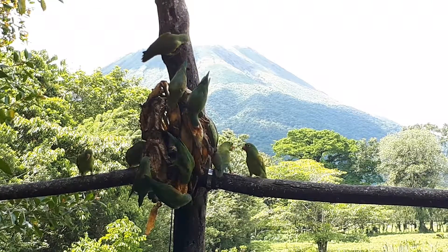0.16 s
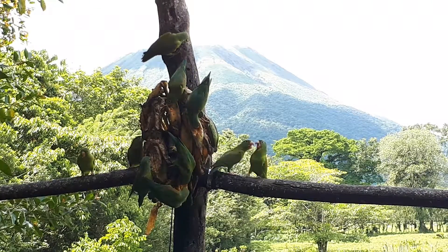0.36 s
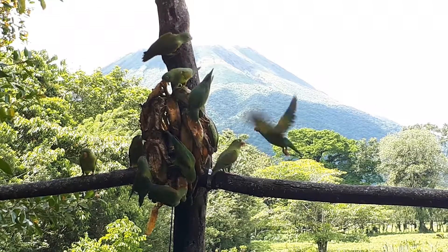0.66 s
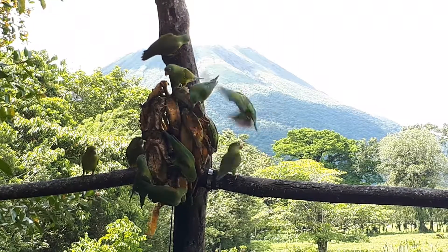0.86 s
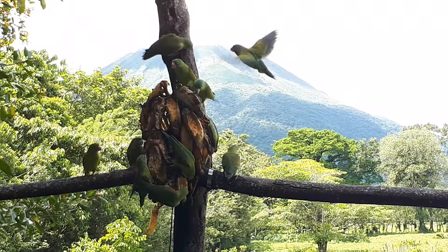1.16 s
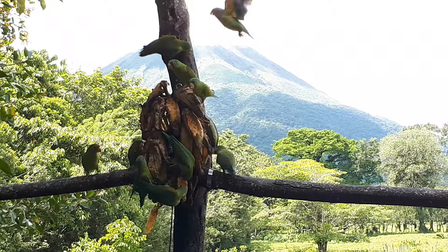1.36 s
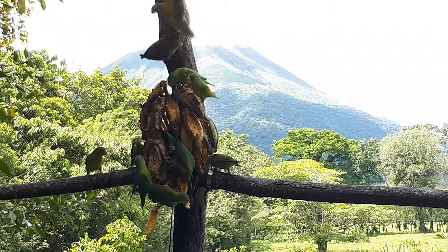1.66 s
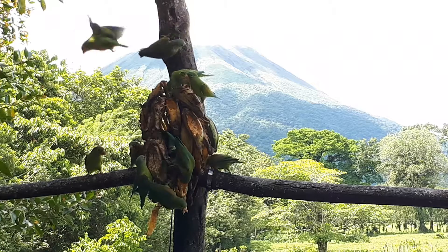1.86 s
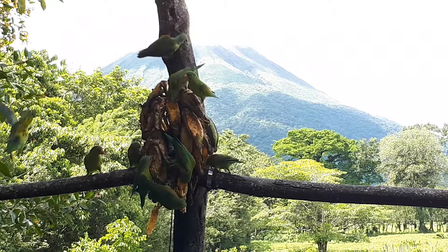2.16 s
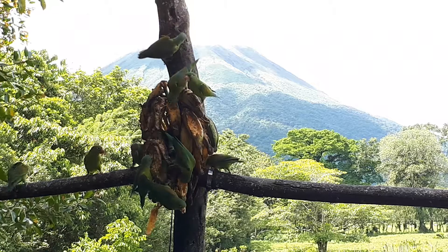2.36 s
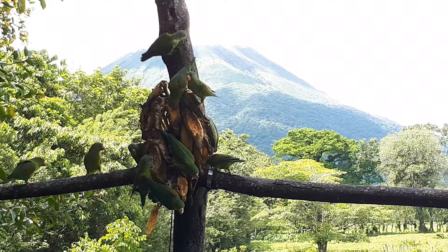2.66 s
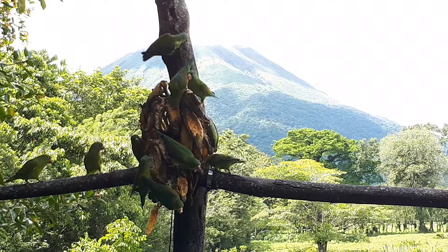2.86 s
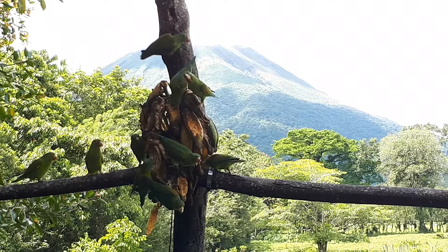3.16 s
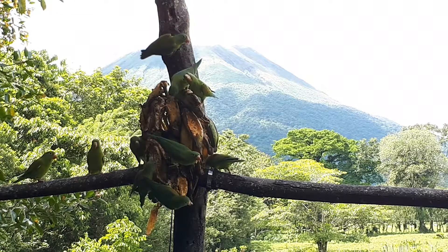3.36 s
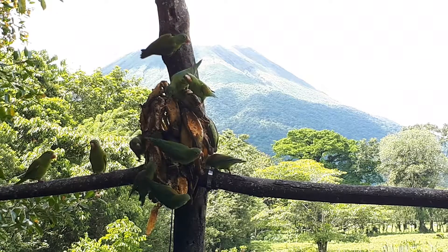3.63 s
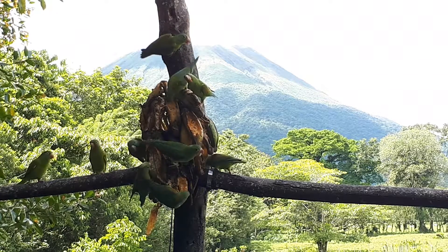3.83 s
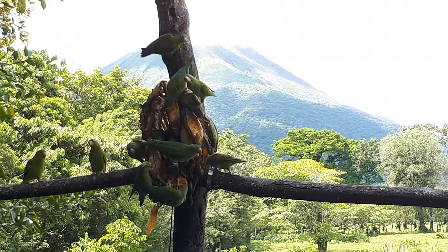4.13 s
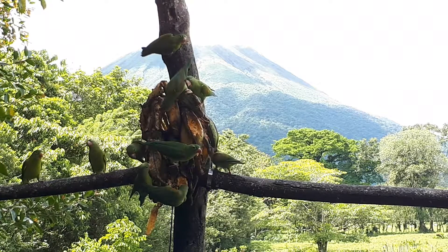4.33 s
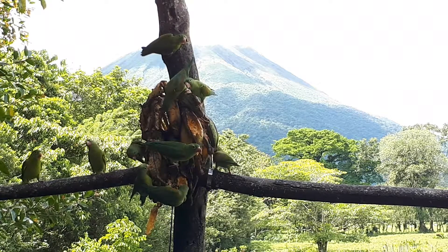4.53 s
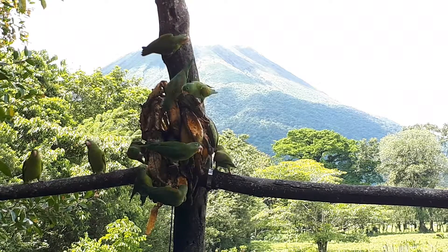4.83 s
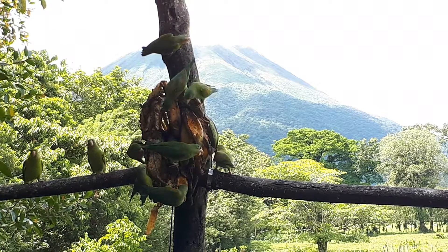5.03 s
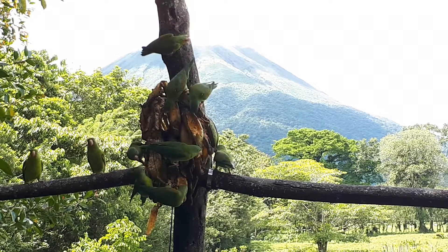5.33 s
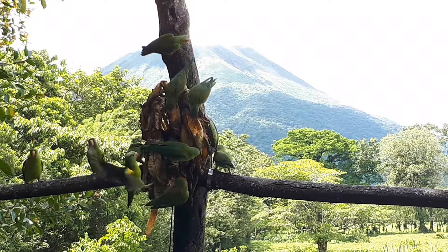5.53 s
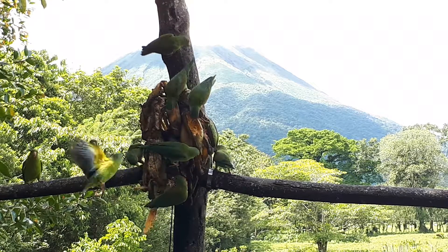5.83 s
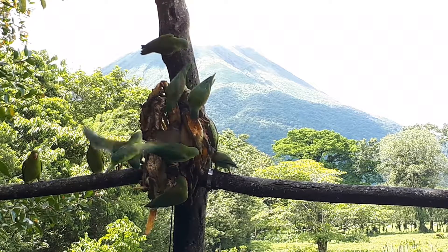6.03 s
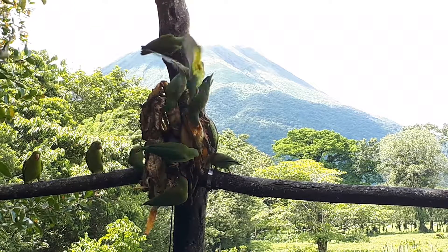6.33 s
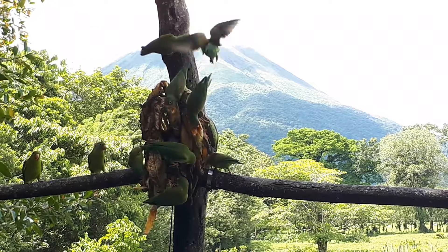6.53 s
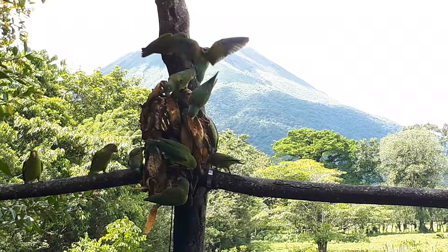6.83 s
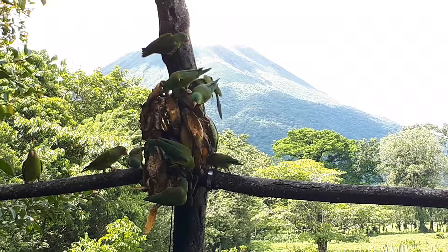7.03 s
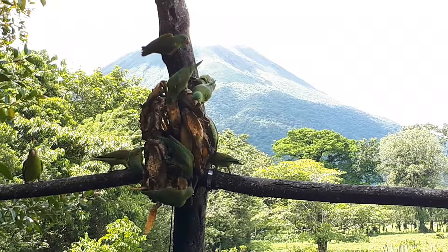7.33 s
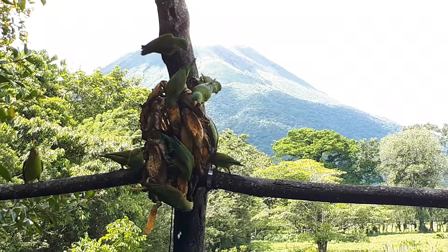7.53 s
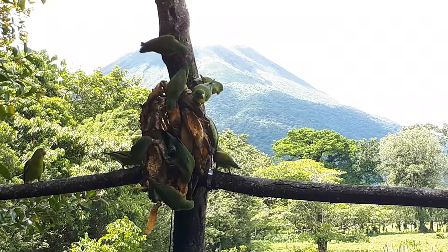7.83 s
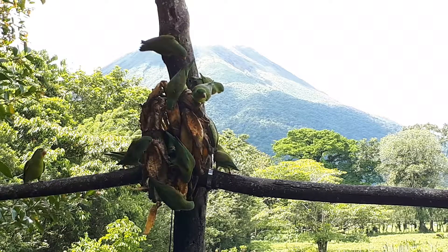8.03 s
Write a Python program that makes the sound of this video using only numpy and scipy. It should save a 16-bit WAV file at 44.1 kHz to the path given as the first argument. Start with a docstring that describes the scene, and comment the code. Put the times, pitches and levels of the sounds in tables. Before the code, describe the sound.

Continuous shrill, scratchy parakeet chatter in the open air, close birds slightly left of centre and a wide flock behind with short diffuse echoes from trees. A thin rising whistle opens it, rapid squawks and hard chips follow, then a looser stretch of throbbing croaks and squeaks. Near the end the squabbling thickens again, with a soft low flutter of wings. Quiet hiss and faint hum stay beneath.

```python
"""In open country, a flock of small parrots chatters on a feeder a few metres away.
Each squawk is an overtone series on a trilling, jumping pitch, wrapped in rasp by random modulation.
Overlapping squawks from the trees behind fill the gaps, with scattered echoes around all the birds.
Wings whirr now and then as resonant noise; a faint low drone and hiss, both shaped noise, lie underneath."""
import sys
import numpy as np
from scipy import signal
from scipy.fft import rfft, irfft, next_fast_len
from scipy.io import wavfile
from scipy.ndimage import uniform_filter1d, map_coordinates

SR = 44100
rng = np.random.default_rng(int(sys.argv[2]) if len(sys.argv) > 2 else 0)


def to_wav(sig):
    """Store sig (one row per channel, or 1-D mono) as 16-bit WAV at the path in sys.argv[1].

    Samples outside -1..1 are clipped; the rate is SR.
    """
    pcm = np.clip(np.atleast_2d(sig), -1, 1) * 32767
    pcm = np.round(pcm).astype(np.int16)
    wavfile.write(sys.argv[1], SR, pcm.T)  # frames by channels


N = 361179
TOP_HZ = 15750  # upper band limit


# Squawks of the near birds. Each row: time in seconds, length in ms, nominal level in dB,
# throat resonance in Hz before it sinks, treble tilt at the start in dB per octave.
SQUAWKS = [(0.067, 114, -41.5, 4304, -3), (0.179, 50, -33, 2420, 2.5), (0.348, 46, -36, 2275, 3),
           (0.418, 45.4, -27, 3257, 7), (0.495, 41, -36, 2885, -1.5), (0.601, 55, -37, 2850, -2),
           (0.715, 28, -39.5, 2877, 1), (0.771, 58.6, -33, 2846, 2), (0.908, 34.7, -32, 3035, 4),
           (1.02, 41, -31.5, 2956, 2.5), (1.097, 77, -32.5, 2895, 4.5), (1.226, 56, -30.5, 2985, 7),
           (1.336, 63, -30, 3056, 5), (1.43, 63, -31.5, 2602, 2.5), (1.541, 67, -32, 2425, 5),
           (1.61, 42, -27, 2565, -3.5), (1.662, 43, -36.5, 3550, 5.5), (1.74, 56, -36, 2550, 3),
           (1.82, 47, -33, 5620, 4.5), (1.909, 71, -41, 2352, 2), (1.981, 31.5, -28, 2473, 3),
           (2.11, 63.4, -30.5, 2557, 2), (2.33, 37, -35.5, 3000, -2.5), (2.468, 54, -36, 2440, 0),
           (2.627, 77, -49, 2890, -6), (2.856, 79, -38, 1910, 4), (2.966, 43, -38, 4210, 1.5),
           (3.641, 83, -34, 4100, 1.5), (3.858, 34, -43, 2580, 3), (4.041, 55, -44.5, 2750, 7),
           (4.185, 98, -42, 2640, 3), (4.441, 83, -38.5, 4180, 4), (4.553, 54, -37, 3590, 2),
           (4.665, 38, -35, 2616, 3), (4.789, 65, -40, 2377, 6.5), (4.956, 71, -43, 1870, 4.5),
           (5.04, 120, -42, 1637, 4), (5.192, 96, -38, 2340, -16.5), (5.347, 94, -43.5, 5510, 4.5),
           (5.609, 40, -38.5, 2013, 0.5), (5.758, 48, -38.5, 2880, 2.5), (5.88, 56, -45, 2470, 3.5),
           (5.996, 46, -37, 2840, 2.5), (6.052, 53, -40.5, 1967, 4), (6.103, 46, -37.5, 3270, -1),
           (6.218, 51, -28.5, 3627, 3.5), (6.324, 58, -33.5, 3400, 3), (6.413, 70, -34, 3210, 3),
           (6.543, 65, -34.5, 2950, 4), (6.783, 55.5, -29.5, 4860, 4.5), (6.925, 73, -33.5, 2856, 4.5),
           (7.084, 40, -32, 2884, 2.5), (7.233, 42, -31, 2316, 6.5), (7.433, 61, -35.5, 1765, 3.5),
           (7.519, 45.3, -32.5, 3356, 3), (7.612, 26.4, -32.5, 3850, 4.5), (7.725, 55, -31, 2673, 0.5),
           (7.836, 51, -35.5, 1750, -4), (7.915, 50, -34, 2850, -2), (7.993, 95, -41.5, 1640, -8),
           (8.083, 75, -40, 2576, -9)]
LEAD_S = 0.008  # the squawk's gradual rise begins this long before the listed time


def near_squawks():
    """Superposition: separate rasping squawks add linearly, each from its own side."""
    out = np.zeros((2, N))
    for s, ms, db, hz, tilt_db in SQUAWKS:
        add(out, amp(db) * squawk(ms, hz, tilt_db, rough=0.15), s - LEAD_S, rng.normal(-0.36, 0.76))
    return out


TRILL_HZ = (114.9, 165.2)  # nominal notes a second, from-to, before a slow random drift
TRILL_DEPTH, TRILL_GAP = 0.1006, 0.48  # share of pitch swept each way; share of level lost between notes
ATTACK_MS, SAG, THROAT_SAG = 13, 0.3, 0.11  # rise time; log shares by which pitch and throat sink


def squawk(ms, peak_hz, bright_db, rough):
    """Frequency and amplitude modulation: trilled notes step and sweep in pitch, half fading in between."""
    size = int((ms + 40) * SR / 1000)
    u = np.arange(size) * 1000 / SR  # time in ms
    through = u / (ms + 40)
    # the throat resonance lies on a whole overtone of the base pitch
    overtone = max(round(peak_hz / rng.uniform(1120, 1900)), 1)
    base = peak_hz / overtone

    start = rng.random()
    rate = rng.uniform(*TRILL_HZ) * np.exp(0.2 * wobble(size, 40.7))
    beat = start + np.cumsum(rate) / SR
    draws = rng.standard_normal((2, int(beat[-1]) + 1))
    # each note holds one random pitch and strength, with its edges smoothed
    step, strength = uniform_filter1d(draws[:, beat.astype(int)], size=30)

    sweep = TRILL_DEPTH * np.sin(2 * np.pi * beat + rng.uniform(-2.24, -0.69))
    pitch = base * np.exp(SAG * (0.4 - through) + 0.08 * step + sweep)
    pulses = amp(2.34 * strength) * (1 - TRILL_GAP * np.cos(np.pi * beat) ** 2)

    attack = np.clip(u / ATTACK_MS, 0, 1)
    arc = 0.58 + 0.62 * np.sin(np.pi * np.clip(u / ms, 0, 1))
    release = amp(-0.9 * np.clip(u - ms, 0, None))  # 0.9 dB per ms
    throat_hz = peak_hz * np.exp(THROAT_SAG * (0.4 - u / ms))
    voice = syrinx(pitch, throat_hz, 7.6, bright_db - 3 * through, rough)
    return unit(pulses) * attack * arc * release * voice


# Fixed colour of the throat. Each row: frequency in Hz, gain in dB.
THROAT = [(470, -50), (800, -10), (1010, -6.5), (1360, -7), (2420, -2.5), (3100, -3.5), (4900, -6.5),
          (6100, -11), (7500, -12.5), (9100, -21.5), (10300, -19), (12300, -24), (15600, -37)]


def syrinx(pitch, peak_hz, peak_db, bright_db, rough):
    """Source and filter: overtones pass a resonant throat; random modulation smears them into noise."""
    k = np.arange(1, 13)[:, None]
    share = np.clip(rough, 0, 1)
    hz = k * pitch
    resonance = peak_db / (1 + ((hz - peak_hz) / 500) ** 2)
    colour = along(THROAT, hz) + bright_db * np.log2(hz / 3000) + resonance
    flutter = wobble(hz.size, 450, order=1).reshape(hz.shape)
    jitter = 1 + 0.035 * share * wobble(len(pitch), 1812, order=1)
    cycles = np.cumsum(pitch * jitter) / SR
    waves = np.sin(2 * np.pi * (k * cycles + rng.random(k.shape)))
    tones = amp(colour) * (hz < TOP_HZ) * waves
    rasp = np.sqrt(1 - share) + np.sqrt(share) * flutter
    return unit((tones * rasp).sum(0))


# Clear notes inside the squawks.
# Each row: time in seconds, length in ms, pitch in Hz before sag and arch, nominal level in dB.
NOTES = [(0.206, 8.5, 1330, -51), (0.352, 12, 1190, -39), (0.437, 7.4, 1580, -46), (0.443, 4.1, 1510, -34),
         (0.606, 8.4, 1330, -30.5), (0.619, 9.3, 1520, -32.5), (0.636, 6.5, 1500, -36),
         (0.775, 5.2, 2550, -30), (0.917, 7.2, 3210, -35), (1.043, 4.7, 2950, -28), (1.129, 4.9, 2140, -29),
         (1.145, 11, 5100, -38), (1.339, 7.1, 1560, -31), (1.352, 18, 1602, -30.5), (1.442, 16, 2620, -27),
         (1.571, 11, 1460, -29.5), (1.619, 8.5, 3350, -27), (1.626, 6.7, 2510, -23),
         (1.663, 5.3, 1740, -26), (1.745, 4.4, 1640, -23), (1.759, 8.6, 3490, -23.5),
         (1.765, 9.7, 2535, -22), (1.772, 11, 1620, -23.5), (1.789, 7.4, 1153, -27),
         (1.825, 11, 5200, -27.5), (1.91, 13, 1465, -30), (1.935, 9.3, 2434, -26.5),
         (1.942, 9.2, 1524, -26), (2.146, 7.9, 2520, -27), (2.333, 11, 3100, -33), (2.517, 3.9, 4130, -29),
         (2.688, 7.1, 2410, -36.5), (3.663, 17, 4400, -35), (4.783, 11, 1570, -37), (4.8, 17, 2350, -39),
         (4.825, 5.9, 2160, -35), (6.233, 25, 1895, -38), (6.575, 6.6, 1527, -27), (6.815, 29, 3150, -29),
         (6.935, 6.4, 1390, -26), (6.946, 7, 1410, -34), (6.975, 16, 3180, -29.5), (7.074, 5.7, 2700, -31),
         (7.236, 3.9, 2200, -24), (7.244, 5.9, 1305, -27), (7.31, 11, 3280, -33), (7.462, 8.1, 1870, -29.5),
         (7.615, 31, 3900, -36), (7.727, 7, 3520, -40)]
NOTE_SAG = 0.057  # share of the pitch lost through a note
MOUTH_HZ = 2030  # the first overtone above the mouth's corner is loudest


def clear_notes():
    """Resonance: each short gliding tone is loudest at its first overtone above the mouth's corner."""
    out = np.zeros((2, N))
    for s, ms, hz, db in NOTES:
        note = glide(ms, hz, hz * (1 - NOTE_SAG), np.ceil(MOUTH_HZ / hz), 0.13, rough=0.12)
        add(out, amp(db) * note, s, rng.normal(-0.47, 0.31))
    return out


# Piercing notes. Each row: time in seconds, length in ms, pitch in Hz before sag and arch,
# number of the loudest overtone, nominal level in dB.
SCREECHES = [(4.66, 21, 3140, 2, -37.5), (4.978, 21, 2006, 3, -36.5), (6.782, 14.5, 2650, 2, -33),
             (6.801, 11.1, 2490, 2, -26), (6.965, 16, 2510, 2, -32.5)]


def screeches():
    """Formant tracking: the resonance follows a chosen overtone, under a strong treble tilt."""
    out = np.zeros((2, N))
    for s, ms, hz, overtone, db in SCREECHES:
        note = glide(ms, hz, hz * (1 - NOTE_SAG), overtone, 4.8, rough=0.077)
        add(out, amp(db) * note, s, rng.normal(-0.4, 0.3))
    return out


# Hard bright chips. Each row: time in seconds, nominal level in dB.
CHIPS = [(0.351, -31), (0.374, -29), (0.396, -30), (0.717, -39), (0.816, -30), (1.541, -26), (1.684, -24.5),
         (1.701, -24), (1.8297, -21.5), (1.8358, -24), (1.851, -18.5), (1.866, -25), (2.0193, -22),
         (2.7496, -40.5), (4.6633, -43)]
CHIP_MS, CHIP_FROM_HZ, CHIP_TO_HZ = 4.74, 1980, 1640  # pitches before the arch


def chips():
    """Transient: a falling note of a few cycles, loudest at its third overtone, is heard as a chip."""
    out = np.zeros((2, N))
    for s, db in CHIPS:
        note = glide(CHIP_MS, CHIP_FROM_HZ, CHIP_TO_HZ, 3, 0.34, rough=0.5)
        add(out, amp(db) * note, s, rng.normal(-0.49, 0.55))
    return out


# Gliding calls, from short steep downsweeps to long throbbing croaks. Each row: time in seconds,
# length in ms, pitch from in Hz and pitch to in Hz (both before the arch), level in dB before the throb.
CROAKS = [(0.761, 54, 1668, 976, -38.5), (1.025, 67, 1607, 1150, -44.5), (1.162, 66, 1750, 1320, -44),
          (2.151, 120, 1350, 1060, -49), (2.438, 155, 1512, 1106, -46), (2.748, 22, 3200, 1780, -44),
          (2.775, 130, 1050, 1538, -44), (3.025, 63, 1386, 1645, -44), (3.1, 140, 4320, 3890, -44),
          (3.249, 130, 2675, 2554, -47), (3.316, 76, 1426, 1410, -43), (3.41, 143, 1269, 960, -47),
          (3.46, 80, 3600, 3460, -47), (3.589, 62, 4000, 5770, -42.5), (3.65, 60, 916, 970, -46),
          (4.172, 59, 1600, 995, -48.5), (4.216, 53, 1100, 1860, -45), (4.403, 110, 3000, 2760, -42),
          (4.57, 83, 2770, 2900, -45), (4.673, 44, 2294, 766, -47.5), (4.815, 32.7, 2544, 930, -42),
          (4.71, 69, 850, 990, -45.5), (4.83, 55, 4400, 4200, -49), (4.869, 74, 950, 1133, -53),
          (4.84, 84, 1450, 1730, -53), (4.95, 65, 1865, 1945, -43), (5.06, 36, 1460, 1484, -42),
          (5.17, 83, 850, 1105, -42), (5.19, 150, 4580, 4110, -51), (5.21, 65, 2400, 2210, -42),
          (5.311, 164, 1076, 1250, -46.5), (5.421, 115, 1493, 1176, -47), (7.431, 77, 1750, 1728, -37),
          (7.549, 88, 1084, 942, -44), (7.861, 71, 1787, 1720, -41), (7.998, 83, 1690, 1520, -53),
          (8.099, 114, 1450, 840, -49.5)]
THROB_HZ, THROB_DEPTH = 52.8, 0.64  # rate; depth 0-1 before the power that sharpens it


def croaks():
    """Amplitude modulation: a throb shapes rough glides, once or twice in short ones, often in long ones."""
    out = np.zeros((2, N))
    for s, ms, hz0, hz1, db in CROAKS:
        note = glide(ms, hz0, hz1, 1.1, 0.92, rough=0.36)
        throb = 1 - THROB_DEPTH * np.cos(2 * np.pi * THROB_HZ * np.arange(len(note)) / SR)
        add(out, amp(db) * throb ** 1.26 * note, s, rng.normal(-0.33, 1.0))
    return out


ARCH = 0.0586  # share of the pitch by which a held note starts and ends flat


def glide(ms, hz0, hz1, overtone, bright_db, rough):
    """Frequency glide: one note slides between two pitches and the throat follows its loudest overtone."""
    u = np.linspace(0, 1, int(ms * SR / 1000))
    pitch = (hz0 + (hz1 - hz0) * u) * (1 - ARCH * (2 * u - 1) ** 2)
    voice = syrinx(pitch, overtone * pitch, 13.2, bright_db, rough)
    return voice * signal.windows.tukey(len(pitch), 0.6)


# A thin rising whistle. Each row: time in seconds, frequency in Hz, level of the fundamental in dB.
WHISTLE = [(0, 4660, -41), (.08, 5020, -51), (.1, 5200, -40), (.14, 5260, -53)]


def whistle():
    """Harmonic series: a nearly pure tone carries weak second and third harmonics."""
    hz, db = curve(WHISTLE)
    phase = 2 * np.pi * np.cumsum(hz) / SR
    sounding = np.arange(N) < WHISTLE[-1][0] * SR
    tone = np.sin(phase) + 0.072 * np.sin(2 * phase) + 0.25 * np.sin(3 * phase)
    return amp(db) * sounding * tone


# Birds in the trees. Each row: time in seconds, level in dB.
FLOCK = [(0.0, -45.5), (0.27, -42), (0.75, -44), (1.85, -33), (2.33, -38.5), (2.6, -43), (3.67, -41.5),
         (4.04, -42), (4.88, -44), (5.27, -38.5), (5.6, -48), (6.25, -38.5), (6.77, -44.5), (6.98, -37),
         (7.32, -40), (7.66, -34), (7.96, -43), (8.19, -41)]
# Treble of their babble against the rest. Each row: time in seconds, gain in dB.
FLOCK_TREBLE = [(0, 5.5), (.6, -4), (1.3, -1.5), (2.2, 3.5), (2.75, -8), (3.15, 3), (4.0, 1), (4.5, 3.5),
                (5.35, 2), (5.7, 1), (6.6, -2), (7.6, 0), (8.19, -1.5)]
TREBLE_HZ = 4740  # corner above which that gain acts
FAR_LOW_HZ, FAR_LOW_DB = 1830, 2  # corner and lift of the babble's low overtones


def far_birds(count=680, voices=160):
    """Incoherent summation: many squawks, started without a pause, overlap into a babble."""
    out = np.zeros((2, N))
    calls = []
    for long, high in rng.random((voices, 2)):
        calls.append(squawk(25 + 85 * long, 2100 * 2.4 ** high, 0.75, rough=0.21))
    for n, (when, which, loud, side) in enumerate(rng.random((count, 4))):
        s = (n - 3 * when) / count * N / SR
        add(out, amp(5.4 * loud) * calls[int(which * voices)], s, 2.7 * (side - 0.6))
    treble = filtered(out, lambda hz: 1 / (1 + (TREBLE_HZ / (hz + 1)) ** 6))
    out += (amp(curve(FLOCK_TREBLE)[0]) - 1) * treble
    babble = filtered(out, lambda hz: amp(FAR_LOW_DB / (1 + (hz / FAR_LOW_HZ) ** 4)))
    return amp(curve(FLOCK)[0]) * unit(babble)


# Decay of the echoes. Each row: frequency in Hz, time in seconds to fall by 60 dB.
TREES = [(500, 0.32), (3000, 0.35), (12000, 0.42)]
ECHO_S = 0.25  # interval between freshly drawn random echo patterns, which crossfade
ECHO_WIDENS = 0.13  # stereo width grows as this power of frequency


def trees(x):
    """Diffuse scattering: decaying noise echoes, partly alike on both sides, crossfade to new patterns."""
    out, step = np.zeros_like(x), int(ECHO_S * SR)
    for start in range(-step, N, step):
        hz, t, z = signal.stft(rng.standard_normal((2, SR // 2)), SR, nperseg=256)
        width = np.array([hz ** 0, (hz / 3000) ** ECHO_WIDENS])[..., None]
        decay = amp(-60 * t / along(TREES, hz)[:, None])
        mid, side = signal.istft(z * width * decay, SR, nperseg=256)[1]
        tail = np.array([mid + 0.46 * side, mid - 0.5 * side]) / np.linalg.norm(mid)
        at = np.arange(max(start, 0), min(start + 2 * step, N))
        fade = np.sin(np.pi * (at - start) / (2 * step))
        echo = signal.fftconvolve(x[:, at] * fade, tail, axes=1)
        out[:, at[0]:at[0] + echo.shape[1]] += echo[:, :N - at[0]]
    return out


# Wing whirrs. Each row: centre in seconds, length in seconds between the points at 1/e of the peak,
# level in dB at the centre before the beat, resonance in Hz.
WINGS = [(0.047, 0.68, -54.5, 259), (0.29, 0.21, -50.5, 232), (2.604, 0.12, -54.5, 445),
         (4.04, 0.2, -49.5, 414), (5.817, 0.2, -52, 362), (6.337, 0.16, -39.5, 200), (6.44, 0.24, -52, 184),
         (7.644, 0.067, -43.5, 402), (7.725, 0.13, -49.5, 312)]


def wings():
    """Broad resonance: low turbulent air, pushed gently once a wing beat, swells and fades."""
    out, t = np.zeros((2, N)), np.arange(N) / SR
    for s, long, db, hz in WINGS:
        resonance = lambda f: (f * hz) ** 2 / ((hz * hz - f * f) ** 2 + (f * hz * 1.47) ** 2)
        air = hiss(resonance, alike=[(hz, 0.97)])
        beats = 1 + 0.056 * np.sin(2 * np.pi * 17 * (t - s) + np.pi / 2)  # 17 a second
        out += amp(db) * air * beats * np.exp(-(2 * (t - s) / long) ** 2)
    return out


# Level of the drone. Each row: time in seconds, level in dB.
DRONE = [(0, -57), (1, -58.5), (2.4, -57), (3.2, -58.5), (4.5, -60), (5.3, -60.5), (6.7, -62), (7.5, -57.5),
         (8.19, -58.5)]
# Bands of the drone. Each row: centre in Hz, width in Hz, relative level in dB before the sum is squared.
HUM = [(92.3, 2.3, 2), (124.3, 8.7, -4), (206.7, 7.1, -3.5), (410, 41, -10), (610, 14.4, -8)]


def drone():
    """Narrow-band noise: random excitation of a few low resonances wavers like an unsteady hum."""
    def bands(f):
        total = sum(amp(db) * f * w / np.hypot(c * c - f * f, f * w) for c, w, db in HUM)
        return total ** 2
    return amp(curve(DRONE)[0]) * hiss(bands, alike=[(100, 1.0)])


# Spectrum of the steady air. Each row: frequency in Hz, relative level in dB per Hz.
AIR = [(25, -20), (55, -2), (100, 0), (500, -6.5), (800, -7.5), (3000, -6.5), (15600, -20)]
# Left-right likeness of the air. Each row: frequency in Hz, correlation 0-1.
AIR_ALIKE = [(25, 0.75), (60, 1), (500, 0.92), (12000, 0.78)]


def steady_air():
    """Stationary broadband noise: a fixed spectrum gives a steady hiss."""
    return amp(-52.0) * hiss(lambda f: amp(along(AIR, f)), alike=AIR_ALIKE)


def hiss(response, alike):
    """Interchannel correlation: stereo noise of rms 1 shares what the (Hz, likeness) points ask for."""
    turn = lambda f: np.arccos(np.clip(along(alike, f), 0, 1)) / 2
    shares = lambda f: response(f) * [np.cos(turn(f)), np.sin(turn(f))]
    mid, side = filtered(rng.standard_normal((2, N)), shares)
    return unit(np.array([mid + side, mid - side]))


def add(out, sound, s, side):
    """Time and level cues: far enough to one side, a sound arrives there earlier, and always louder."""
    for channel, lean in enumerate((side, -side)):
        i = max(round(s * SR) - int(lean / 1.3), 0)
        out[channel, i:i + len(sound)] += (amp(0.2 * lean) * sound)[:max(N - i, 0)]


def filtered(x, response):
    """Linear filtering: multiply the spectrum by a response of frequency, zero-padded against wrapping."""
    m = next_fast_len(N + SR // 2)
    return irfft(rfft(x, m) * response(np.fft.rfftfreq(m, 1 / SR)), m)[..., :N]


def wobble(size, rate, order=3):
    """Band-limited randomness: a spline of the given order through rate random knots a second."""
    knots = rng.standard_normal(int(size * rate / SR) + 4)
    return map_coordinates(knots, [np.arange(size) * rate / SR + 1], order=order)


def curve(rows):
    """Linear interpolation in time: one value per sample for each column after the time."""
    s, *cols = np.transpose(rows)
    return [np.interp(np.arange(N) / SR, s, c) for c in cols]


def along(points, hz):
    """Logarithmic frequency scale: interpolate (Hz, value) points along it."""
    f, v = np.transpose(points)
    return np.interp(np.log(hz + 1), np.log(f + 1), v)


def amp(db):
    """Decibel law: the amplitude gain of a level in dB."""
    return 10 ** (np.asarray(db) / 20)


def unit(x):
    """Effective value: scale x to rms 1."""
    return x / np.sqrt(np.mean(x ** 2) + 1e-20)


def scene():
    """Superposition: direct and echoed birds, with their lows removed, over wings, drone and air."""
    near = near_squawks() + clear_notes() + screeches() + chips() + croaks() + whistle()
    far = far_birds()
    birds = near + far + trees(amp(-5.5) * near + amp(-4.5) * far)
    # a small bird radiates little below its pitch
    small = lambda hz: 1 / np.hypot(1, (860 / (hz + 1)) ** 6)
    return filtered(birds, small) + wings() + drone() + steady_air()


LEFT_DB = -0.4  # left channel against the right


def record(dry):
    """Band limitation: the channels differ slightly in gain and nothing passes above the limit."""
    balance = amp([[LEFT_DB / 2], [-LEFT_DB / 2]])
    return filtered(dry * balance, lambda hz: hz < TOP_HZ)


dry = scene()
out = record(dry)
to_wav(out)
```